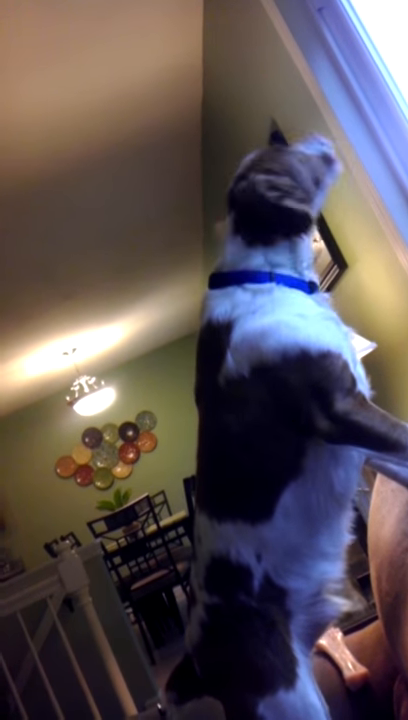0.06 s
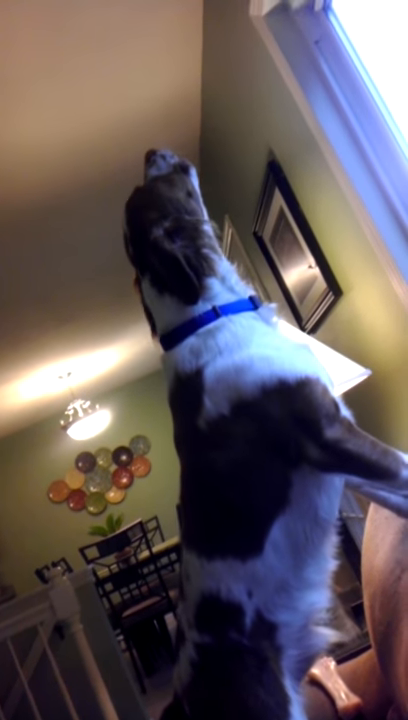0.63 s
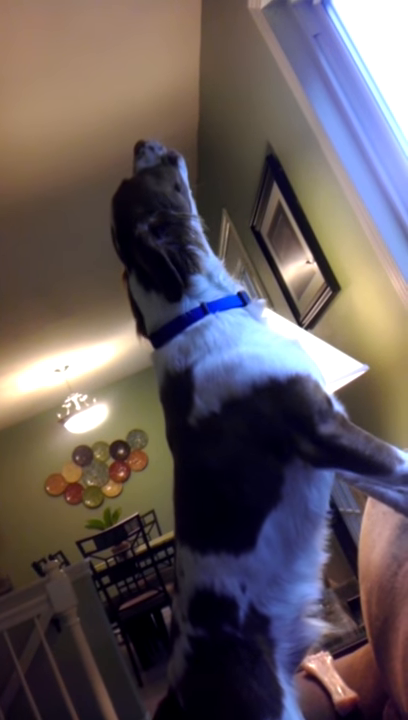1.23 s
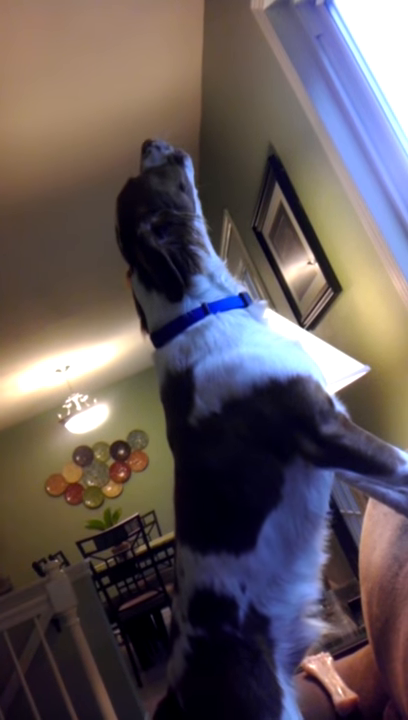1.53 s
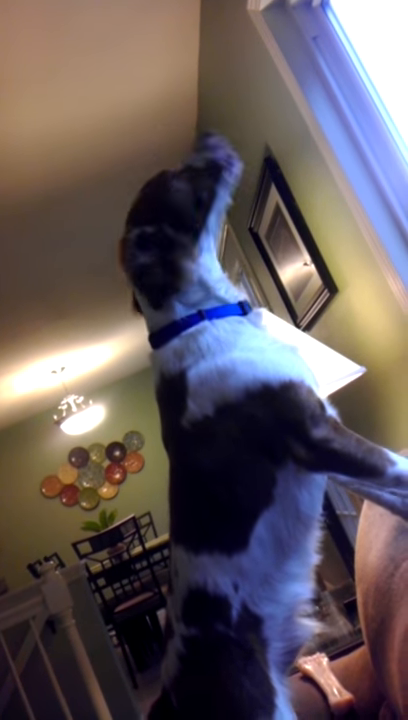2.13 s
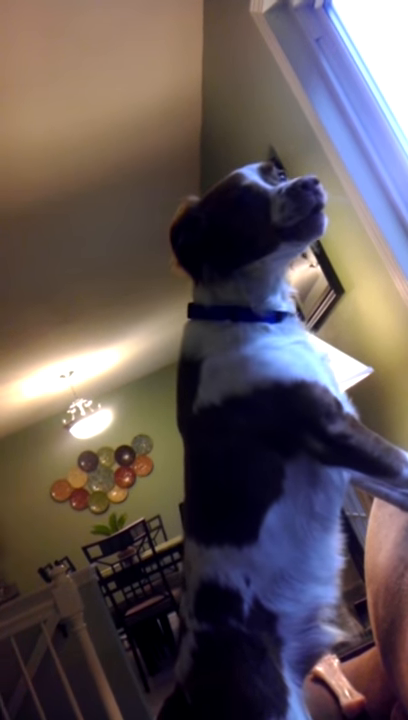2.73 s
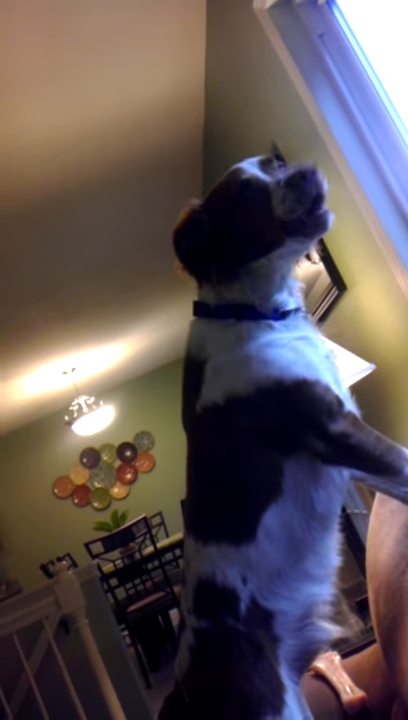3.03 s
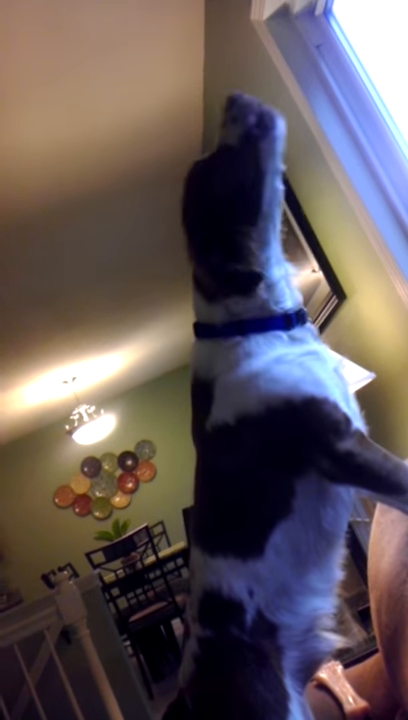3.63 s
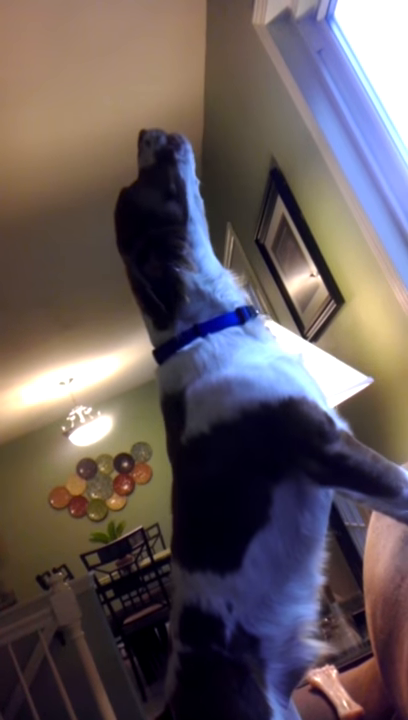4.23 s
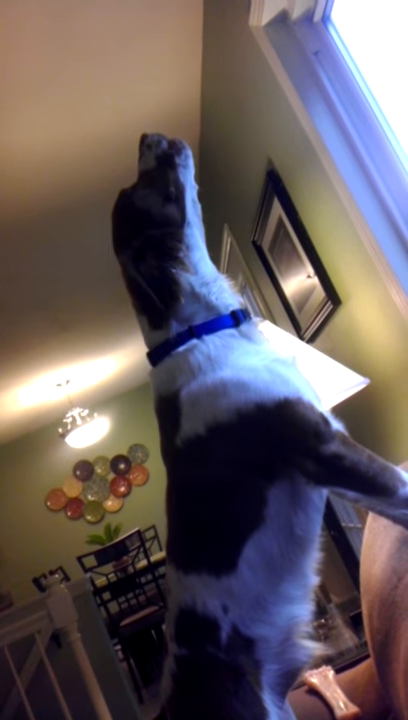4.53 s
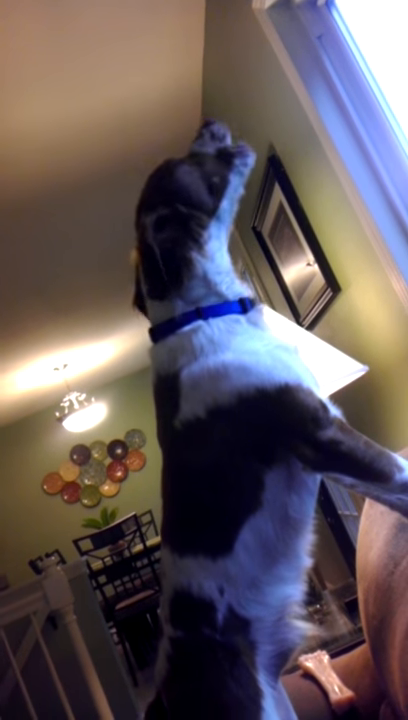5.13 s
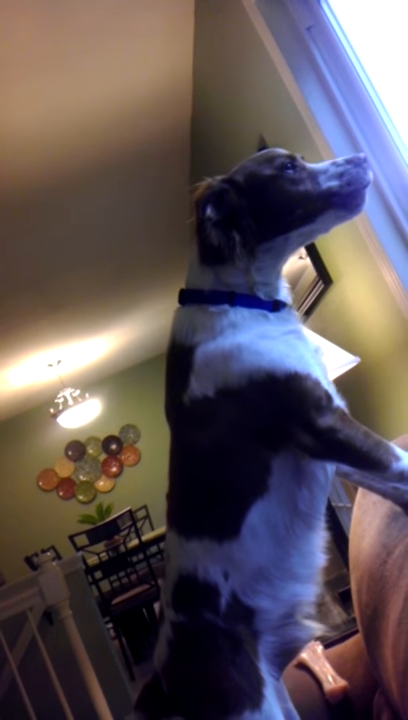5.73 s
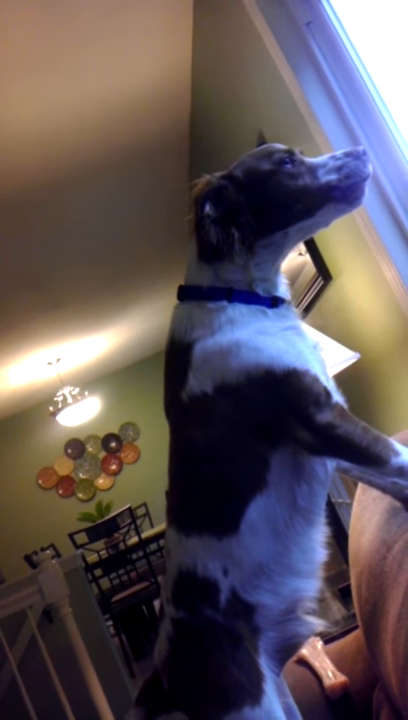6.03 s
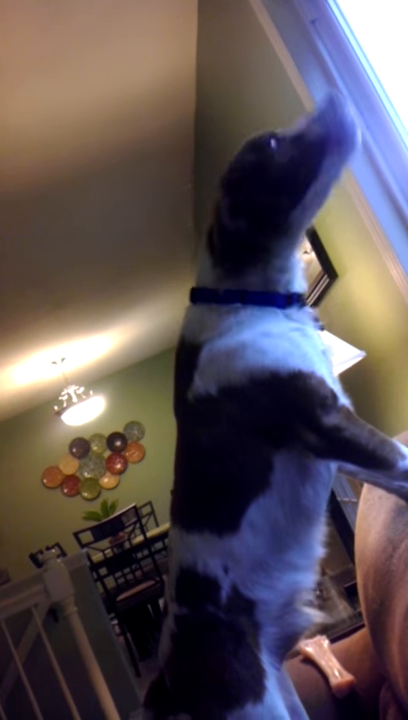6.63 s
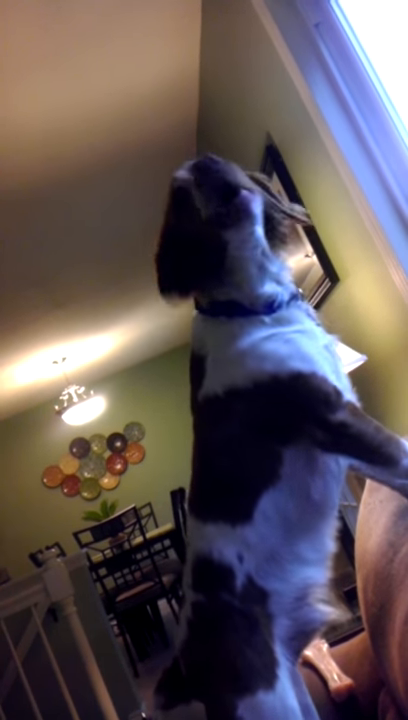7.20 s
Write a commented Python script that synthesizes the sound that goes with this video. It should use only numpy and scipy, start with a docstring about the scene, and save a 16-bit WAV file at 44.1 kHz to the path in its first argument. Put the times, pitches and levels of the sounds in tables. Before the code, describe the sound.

Close, wavering dog howls alternate with loud, high yips and a soft whine in a quiet, hard-walled room.

```python
"""A dog yips and howls close by in a quiet, hard-walled room, and whines thinly between the calls.
Its larynx carries two pitches at once: they breed sum and difference tones and break into a hoarse rasp.
Every yip scoops up, breaks and sags; every howl is a held note with a surge of effort at each end.
One microphone, widened with a short delay, picks it all up and overloads on the yips."""
import sys
import numpy as np
from scipy import signal
from scipy.fft import rfft, irfft, next_fast_len
from scipy.io import wavfile
from scipy.ndimage import uniform_filter1d, minimum_filter1d, map_coordinates

SR = 44100
rng = np.random.default_rng(int(sys.argv[2]) if len(sys.argv) > 2 else 0)


def to_wav(s):
    """Save 16-bit WAV."""
    ch = np.atleast_2d(s).T  # columns
    pcm = np.round(np.clip(ch, -1, 1) * 32767)  # PCM
    wavfile.write(sys.argv[1], SR, pcm.astype(np.int16))


N = 320164
TIME = np.arange(N) / SR
CONTROL_TIME = np.arange(0, N / SR, .001)

# The two long howls before surges and hoarseness, a list of points each:
# time_s, high_pitch_hz, high_level_db, low_level_db, effort_db
HOWL_CONTOURS = [
    [(.12, 901, -27.5, -42.5, -39.5), (.265, 850.2, -20, -30.5, -37), (.33, 794.6, -11.5, -35, -38),
     (.47, 728, -18.5, -28.5, -43), (.7, 723.6, -11.5, -45.5, -37.5), (.89, 708.6, -21, -30.5, -44),
     (.935, 700, -28.5, -35.5, -43), (.97, 691.7, -15.5, -29.5, -39.5), (1.14, 682.3, -15, -28.5, -43),
     (1.175, 662, -31, -30, -39), (1.22, 632, -31, -32, -38), (1.282, 682, -14, -29, -39),
     (1.36, 672, -26.5, -32, -36), (1.52, 593.8, -25, -28, -34), (1.62, 503.1, -31, -17.5, -34),
     (1.77, 548.6, -24, -36, -31.5), (1.84, 505.7, -19.5, -15.5, -33.5), (1.98, 591.8, -23, -29, -33),
     (2.12, 504.3, -22.5, -16.5, -34.5), (2.2, 423.6, -30, -21.5, -40)],
    [(3.56, 520, -34.5, -23.5, -39), (3.7, 512, -38, -23, -40.5), (3.85, 494.5, -28.5, -23.5, -35),
     (4.02, 489, -28, -31, -42.5), (4.27, 569, -19, -27.5, -34), (4.37, 511.5, -19.5, -22.5, -33),
     (4.45, 555.6, -22.5, -20.5, -35), (4.53, 537, -18, -23, -33.5), (4.62, 565.6, -19, -21, -32),
     (4.76, 478.2, -19, -19, -36), (4.86, 571.8, -21.5, -21, -31.5), (4.96, 487.8, -20, -23.5, -31),
     (5.03, 412.8, -24, -19.5, -39), (5.1, 400, -41, -30.5, -47), (5.117, 459.4, -29, -16, -43),
     (5.14, 527.6, -19, -31.5, -42), (5.166, 423, -20, -29.5, -41), (5.18, 489.3, -20, -24.5, -39.5),
     (5.24, 494.1, -19.5, -26.5, -38.5), (5.285, 505.3, -11.5, -29, -35.5)],
]


def amp(db):
    """Decibels to gain."""
    return 10 ** (np.asarray(db) / 20)


def unit(x):
    """x at rms 1."""
    return x / np.sqrt(np.mean(x ** 2) + 1e-20)


def along(points, hz):
    """(Hz, value) points read on a log axis."""
    freqs, values = np.transpose(points)
    return np.interp(np.log(hz + 1), np.log(freqs), values)


def curves(rows, t=TIME):
    """Each column after the first, read at the times t."""
    times, *columns = np.transpose(rows)
    return [np.interp(t, times, column) for column in columns]


def drift(t, rate):
    """A smooth random curve read at the times t, rate knots a second."""
    return map_coordinates(rng.standard_normal(int(N * rate / SR) + 4), [t * rate])


def wobble(rate):
    """A drift with one value per sample."""
    return np.interp(TIME, CONTROL_TIME, drift(CONTROL_TIME, rate))


def filtered(x, response):
    """x shaped by a frequency response."""
    size = next_fast_len(N + SR // 4)
    return irfft(rfft(x, size) * response(np.fft.rfftfreq(size, 1 / SR)), size)[..., :N]


def levelled(x, from_hz, to_hz):
    """x scaled so that its running rms within a band is 1."""
    part = filtered(x, lambda hz: (hz > from_hz) & (hz < to_hz))
    return x / np.sqrt(np.abs(uniform_filter1d(part ** 2, 2600)) + 1e-14)


def envelope(t, start, end, attack_s, release_s):
    """Attack, hold and release, in dB."""
    gain = np.clip((t - start) / attack_s, 0, 1) ** 2 * np.exp(-np.maximum(t - end, 0) / release_s)
    return 20 * np.log10(gain + 1e-6)


def scoop(age, depth, scoop_s):
    """Pitch as a share of its goal while a voice slides up to it."""
    return 1 - depth * np.exp(-np.maximum(age, 0) / scoop_s)


def yip(t, start, attack, length, release, lead, break_after, top_hz, low_db, high_db, effort_db):
    """Controls of a yip: voices an octave apart scoop up, crack in a burst, lock again and sag."""
    break_attack_s, burst_s, low_linger_s, effort_attack_s = .014, .032, .03008, .026
    sag, wander, fade_db_per_s = .12, .017, 25.5
    end, age = start + length, t - start
    fade_db = -fade_db_per_s * np.maximum(age, 0)
    since_break = age - break_after
    broken = np.clip(1 + since_break / break_attack_s, 0, 1)
    burst = broken * np.exp(-(np.maximum(since_break, 0) / burst_s) ** 2)
    bend = np.maximum(1 - sag * (np.maximum(age, 0) / length) ** 2, .7)
    pitch_hz = top_hz * bend * (1 + wander * broken * drift(t, 55))
    # at the break both pitches dip, the low voice gives way and the effort jumps
    low_hz = pitch_hz / 2 * scoop(age + lead, depth=.36, scoop_s=.018) * (1 - .12 * burst)
    high_hz = pitch_hz * scoop(age, depth=.17, scoop_s=.009) * (1 - .02167 * burst)
    rough = .23 * broken + .5 * burst
    return [low_hz, high_hz, rough,
            low_db + fade_db - 6 * burst + envelope(t, start - lead, end + low_linger_s, attack, release),
            high_db + fade_db + envelope(t, start, end, attack, release),
            effort_db + fade_db + 5.5 * burst + envelope(t, start, end, effort_attack_s, release)]


def howl(t, contour):
    """Controls of a howl: a held note with a yelp at each end, straying and heaving when hoarse."""
    # Hoarseness of the howls: time_s, roughness (0-1)
    hoarseness = [(.14, .3), (.18, .55), (.23, .38), (.36, .33), (.48, .08), (.85, .08), (1, .15),
                  (1.14, .16), (1.18, .52), (1.24, .48), (1.28, .3), (1.4, .52), (1.62, .35), (1.75, .45),
                  (1.92, .36), (2.02, .15), (2.07, .17), (2.11, .45), (2.18, .25), (3.65, .25), (3.78, .5),
                  (4.12, .45), (4.24, .26), (4.34, .42), (4.6, .3), (4.92, .33), (5.05, .12), (5.15, .17),
                  (5.175, .3), (5.19, .12), (5.23, .12), (5.255, .5), (5.3, .15)]
    rough, = curves(hoarseness, t)
    high_hz, high_db, low_db, effort_db = curves(contour, t)
    high_lift, low_lift, high_boost, low_boost, effort_boost = surges(t)
    # the low pitch follows the effort, and a very high upper voice pulls it up too
    floor_hz = 397.9 + .33 * np.maximum(high_hz - 685, 0)
    low_hz = np.maximum(432.5 + 4.5 * (effort_db + 33.5), floor_hz)
    on_db = envelope(t, contour[0][0], contour[-1][0], attack_s=.03, release_s=.02)
    stray = lambda share: 1 + share * rough ** 2 * drift(t, 24)
    heave = lambda depth_db: depth_db * rough * np.tanh(drift(t, 22))
    return [low_hz * stray(.2) + low_lift, high_hz * stray(.13) + high_lift, rough,
            low_db + low_boost + on_db + heave(6.5),
            high_db + high_boost + on_db + heave(6.5),
            effort_db + effort_boost + on_db + heave(3)]


def surges(t, fall_s=.085, effort_lead_s=.012):
    """What the yelps add to pitches and levels; the high voice holds a plateau and falls back first."""
    # Yelps that open and close the howls: peak_s, rise_s, high_fall_s, high_lift_hz, low_lift_hz,
    # high_boost_db, low_boost_db, effort_boost_db
    yelps = [(.208, .05, .06, 74.7, 105, 4.5, 27.5, 15), (2.07, .07, .042, 209.5, 40.49, 7, -2.5, 10.5),
             (3.78, .08, 0.06725, 19.81, 45.17, 8.5, 1.5, 9.5),
             (5.213, 0.084, .05, 462, 62.33, 6.5, 12.5, 21.5)]
    total = 0
    for peak_s, rise_s, high_fall_s, high_hz, low_hz, high_db, low_db, effort_db in yelps:
        def bump(top, fall, flatness):
            return np.exp(-np.abs((t - top) / np.where(t < top, rise_s, fall)) ** flatness)
        leap = bump(peak_s, high_fall_s, flatness=3)
        swell = bump(peak_s, fall_s, flatness=2.056)
        push = bump(peak_s - effort_lead_s, fall_s, flatness=2.77)
        total += np.array([high_hz * leap, low_hz * swell, high_db * leap, low_db * swell, effort_db * push])
    return total


def larynx():
    """Controls of all yips and howls, per sample; where calls meet, the louder one takes over."""
    # Short, sharp calls; the second row is the faint ring after the opening yip:
    # start_s, attack_s, length_s, release_s, low_voice_lead_s, break_after_s,
    # top_pitch_hz, low_level_db, high_level_db, effort_db
    yips_and_ring = [(-.11, .015, 0.14, 0.018, -0.024, 0.015, 1190, -10, -15.5, -24),
                     (.01, 0.023, 0.071, 0.02412, -0.023, 0.02, 1099, -21, -25.5, -29.5),
                     (3.049, 0.012, 0.11, 0.016, 0.0071, 0.024, 1165, -6, -3.5, -13.5),
                     (3.374, .022, 0.14, .035, 0.017, 0.046, 1158, -10.5, -8.5, -18.5),
                     (6.529, 0.015, 0.11, 0.021, -0.044, .054, 1191, -6.5, -2.5, -13.5),
                     (6.856, .016, 0.14, 0.03, 0.021, 0.047, 1192, -11, -11, -17),
                     (7.223, 0.015, 0.093, .025, 0.011, 0.039, 1183, -12, -10.5, -22.5)]
    t = CONTROL_TIME
    calls = np.array([yip(t, *row) for row in yips_and_ring] + [howl(t, rows) for rows in HOWL_CONTOURS])
    power = np.sum(amp(calls[:, 3:]) ** 2, axis=1, keepdims=True)
    controls = np.sum(calls * power, axis=0) / power.sum(axis=0)
    return curves(np.column_stack([t, *controls]))


def voice_phases(low_hz, high_hz, jitter, lock_range=.14):
    """Two trembling voices; close to an octave apart, the low one locks to the high one."""
    lock = np.exp(-((high_hz / low_hz - 2) / lock_range) ** 4)
    high = high_hz * (1 + jitter * wobble(170))
    low = low_hz * (1 + jitter * wobble(150) + .008 * wobble(25))
    return 2 * np.pi * np.cumsum([low + lock * (high / 2 - low), high], axis=1) / SR


def pulses(phase, sharp):
    """One pulse a cycle; each harmonic is sharp times the one below."""
    return (1 - sharp ** 2) / (1 - 2 * sharp * np.cos(phase) + sharp ** 2)


def airflow(low_phase, high_phase, low_share, opening):
    """Each voice chops the other's air: the pulsing flow, and its harmonics, sum and difference tones."""
    low_sharp = .72 * low_share ** (.4 + .25 * opening)
    high_sharp = np.clip((.17 + .4 * opening) * (1 - low_share) ** .2, 0, .85)
    flow = pulses(low_phase, low_sharp) * pulses(high_phase, high_sharp)
    partials = flow - 1 - 2 * low_sharp * np.cos(low_phase) - 2 * high_sharp * np.cos(high_phase)
    # the lips radiate the upper partials best, and the long throat spreads each pulse in time
    spread = lambda hz: np.exp(-2j * np.pi * np.sqrt(hz / 60))
    return flow, filtered(partials, lambda hz: (hz / 1300) ** 2.26 * spread(hz))


def throat(x, parting, opening):
    """x through the throat as the pursed lips part (0-1) and the mouth then opens wide (0-1)."""
    # Resonances with pursed lips: centre_hz, half_width_hz, gain_db
    pursed_formants = [(183.2, 72, -32), (365, 16, -1), (470, 81, 5), (550, 120, -2.5), (679.6, 30, 4),
                       (746.2, 24, 12.5), (922, 240, -4), (1120, 200, -12.5), (1317.7, 90, -7),
                       (1801, 390, -23.5), (2235, 97, -20.5)]
    # Response with parted lips: frequency_hz, gain_db
    parted_curve = [(290, -28), (400, 2), (500, 4), (620, -7), (860, 4), (1200, -7.5), (1400, -4.5),
                    (1620, -10), (1820, -24), (2350, -36), (2750, -44), (3400, -35.5), (4200, -68),
                    (5000, -36.5), (5750, -33), (6500, -59.5), (7400, -39), (9000, -76.5)]
    # Response with the mouth wide open: frequency_hz, gain_db
    gaping_curve = [(150, -60), (250, -27.5), (397, -28), (479, 2), (569, -10), (664, -10), (1110, 2.5),
                    (1340, -6.5), (1560, -3), (1880, -7), (2150, -19.5), (2530, -22), (2800, -24),
                    (3050, -26.5), (3320, -29), (4200, -37), (7430, -30), (11000, -47.5), (15000, -57.5)]
    pursed = lambda hz: sum(amp(db) / (1 + ((hz - centre) / width) ** 2) ** 2
                            for centre, width, db in pursed_formants)
    parted = lambda hz: amp(along(parted_curve, hz))
    gaping = lambda hz: amp(along(gaping_curve, hz)) / (1 + (340 / (hz + 1)) ** 6)
    shut, half, wide = (levelled(filtered(x, shape), 1270, 2500) for shape in (pursed, parted, gaping))
    return np.sqrt(1 - opening) * ((1 - parting) * shut + parting * half) + np.sqrt(opening) * wide


def turbulence(centre_hz, width_hz):
    """Air noise in one resonance whose centre moves."""
    a, b = filtered(rng.standard_normal((2, N)), lambda hz: 1 / (1 + (hz / width_hz) ** 4))
    phase = 2 * np.pi * np.cumsum(centre_hz) / SR
    return unit(a * np.cos(phase) + b * np.sin(phase))


def bright_edge(flow, effort_db, pursed, sharp_by=.062, sink_s=.65):
    """Air pulses in upper resonances that start each howl high and sink as the lips purse."""
    # Level ride of the raspy edge: time_s, level_db
    edge_ride = [(.1, -65), (.2, -48.5), (.3, -43.5), (.42, -60), (.6, -69), (1.1, -68.5), (1.5, -57),
                 (2.12, -72), (2.3, -110), (3.5, -100), (3.7, -52), (3.78, -39), (3.9, -54.5), (4.2, -59),
                 (4.95, -68), (5.3, -110)]
    # Its resonances: centre_hz, half_width_hz, gain_db
    edge_formants = [(5420, 130, -2.5), (7040, 300, -18)]
    starts = [contour[0][0] for contour in HOWL_CONTOURS]
    glide = 1 + sharp_by * sum((TIME > start) * np.exp(-np.abs(TIME - start) / sink_s) for start in starts)
    level_db, = curves(edge_ride)
    top = sum(amp(level_db + db + 1.8 * wobble(8.9)) * turbulence(hz * glide, width)
              for hz, width, db in edge_formants)
    ring = pursed * amp(effort_db - 25) * turbulence(3060 * glide, width_hz=100)
    return np.sqrt(flow) * (top + ring)


def yips_and_howls(push_db=3.3):
    """Two coupled voices, their combination tones and a rasp that pulses with them."""
    low_hz, high_hz, rough, low_db, high_db, effort_db = larynx()
    # the harder the dog pushes, the wider its mouth opens
    effort = 1 / (1 + np.exp(-(effort_db + 31) / 2))
    parting = 1 / (1 + np.exp(-(effort_db + 28.5) / 1.2))
    opening = 1 / (1 + np.exp(-(effort_db + 20) / 2))
    low_phase, high_phase = voice_phases(low_hz, high_hz, jitter=(.022 + .03 * opening) * rough)
    shimmer_db = 3 * rough
    clean = amp(low_db + .3 + shimmer_db * wobble(70)) * np.cos(low_phase)
    clean += amp(high_db + .5 + shimmer_db * wobble(68)) * np.cos(high_phase)
    low_share = amp(low_db) / (amp(low_db) + amp(high_db))
    flow, partials = airflow(low_phase, high_phase, low_share, opening)
    tones = throat(partials, parting, opening)
    rasp = throat(np.sqrt(flow) * rng.standard_normal(N), parting, opening)
    # turbulence stirs the highest resonances, the more so with effort
    hiss = filtered(rasp, lambda hz: 1 / (1 + (2900 / (hz + 1)) ** 8))
    hiss *= amp(-12 + 5.7 * effort + 11 * opening)
    # a smooth, gently held note stays nearly pure
    buzz = np.clip(rough / .3 + parting, .5, 1) * np.sqrt(1 - rough ** 2)
    grit = amp(-1.5) * buzz * tones + amp(2.5) * rough * rasp + hiss
    call = amp(push_db * effort) * clean + amp(effort_db + push_db / 2 * opening) * grit
    call += bright_edge(flow, effort_db, pursed=1 - parting)
    # the calls carry almost no bass
    return filtered(call, lambda hz: 1 / (1 + (155 / (hz + 1)) ** 6))


def thin_tone(contour, trim_db, second_db, third_db, waver=.00093, fade_s=.017):
    """A sine with its second and third harmonics, wavering in pitch by a share."""
    pitch_hz, level_db = curves(contour)
    phase = 2 * np.pi * np.cumsum(pitch_hz * (1 + waver * wobble(40))) / SR
    tone = np.sin(phase) + amp(second_db) * np.sin(2 * phase) + amp(third_db) * np.sin(3 * phase)
    sounding = (TIME >= contour[0][0]) & (TIME <= contour[-1][0])
    gate = uniform_filter1d(sounding * 1., int(fade_s * SR))
    return gate * amp(level_db + trim_db) * unit(tone)


def overtone():
    """A third, wavering tone over the first howl."""
    # Its path: time_s, pitch_hz, level_db
    contour = [(.5, 1255, -42), (.9, 1250, -43), (.95, 1285, -33), (1.18, 1250, -35), (1.33, 1285, -32.5),
               (1.42, 1280, -49), (1.63, 1315, -34.5), (1.7, 1320, -45)]
    return thin_tone(contour, trim_db=0, second_db=-45, third_db=-50, waver=.018)


def whistle():
    """A faint, rising whistle between the howls."""
    # Its rise: time_s, pitch_hz, level_db
    contour = [(2.45, 1577, -64.5), (2.8, 1673, -72), (3.04, 1694, -75.5)]
    return thin_tone(contour, trim_db=7.5, second_db=-19, third_db=-43)


def whine():
    """A thin whine that sinks, dips twice in level and flicks up at the end."""
    # Its path: time_s, pitch_hz, level_db
    contour = [(5.52, 1004, -42), (5.752, 960.6, -40), (6.11, 907, -47), (6.216, 882.5, -42),
               (6.47, 854, -43.5), (6.53, 1045, -37)]
    # Brief dips in level: centre_s, half_length_s, depth_db
    level_dips = [(5.891, 0.012, 26), (6.127, 0.015, 8.5)]
    dip_db = sum(depth * np.exp(-((TIME - centre) / width) ** 2) for centre, width, depth in level_dips)
    return amp(-dip_db) * thin_tone(contour, trim_db=-.5, second_db=-34, third_db=-33)


def squeak():
    """A brief, high squeak through the nose."""
    # Its path: time_s, pitch_hz, level_db
    contour = [(6.42, 3320, -55), (6.53, 3370, -50)]
    return thin_tone(contour, trim_db=-4.5, second_db=-3, third_db=-30)


def room_tone(dog, duck_db=11, threshold_db=-32, window=6000):
    """A noise bed that ducks once the dog is loud and returns just after."""
    # Room tone and microphone hiss: frequency_hz, level_db
    spectrum = [(35, -45), (60, -19.5), (295, 0.5), (1390, -9.5), (1710, -8), (1920, -6), (2780, -17.5),
                (12500, -15.5), (14000, -25), (15000, -69.5)]
    bed = unit(filtered(rng.standard_normal(N), lambda hz: amp(along(spectrum, hz))))
    power = np.abs(uniform_filter1d(dog ** 2, window, origin=(window - 1) // 2))
    return amp(-duck_db * power / (power + amp(threshold_db) ** 2)) * bed


def room_reverb(x):
    """The hard walls' answer; each frequency dies at its own speed."""
    # Decay of the room: frequency_hz, t60_s
    decay_times = [(150, 0.4), (500, 0.61), (1200, 0.85), (3000, 0.43), (7000, 0.31), (13000, 0.082)]
    # Colour of the tail: frequency_hz, gain_db
    colour = [(150, 15), (500, -2), (1200, -5.5), (2300, -5), (3800, -18.5), (6000, 7), (8000, 5),
              (9500, -14.5), (12000, -21)]
    hz, t, noise = signal.stft(rng.standard_normal(SR), SR, nperseg=256)
    fade_db = along(colour, hz)[:, None] - 60 * t / along(decay_times, hz)[:, None]
    plain_tail = signal.istft(noise * amp(-60 * t / along(decay_times, 450)), SR, nperseg=256)[1]
    tail = signal.istft(noise * amp(fade_db), SR, nperseg=256)[1] / np.linalg.norm(plain_tail)
    return signal.fftconvolve(x, np.pad(tail, (SR // 150, 0)))[:N]


def limiter(x, ceiling_db, window=400):
    """Turns the gain down around peaks that pass the ceiling."""
    needed = np.minimum(1, amp(ceiling_db) / (np.abs(x).max(axis=0) + 1e-9))
    return x * uniform_filter1d(minimum_filter1d(needed, window), window)


def scene():
    """Dog, room tone and reverb at one microphone."""
    dog = yips_and_howls() + overtone() + whine() + whistle() + squeak()
    return (dog + amp(-59.5) * room_tone(dog) + amp(-7.5) * room_reverb(dog))[None]


def record(dry, delay_samples=71):
    """A delayed copy, added left and subtracted right, gives width; limited yips still overload."""
    mid = dry[0]
    side = amp(-1.75) * np.pad(mid, (delay_samples, 0))[:N]
    wide = limiter(np.array([mid + side, mid - side]), ceiling_db=5.7)
    passband = lambda hz: (hz < 19000) / (1 + (42 / (hz + 1)) ** 4) / (1 + (hz / 14500) ** 8)
    return filtered(np.clip(wide, -1, 1), passband)


dry = scene()
out = record(dry)
to_wav(out)
```